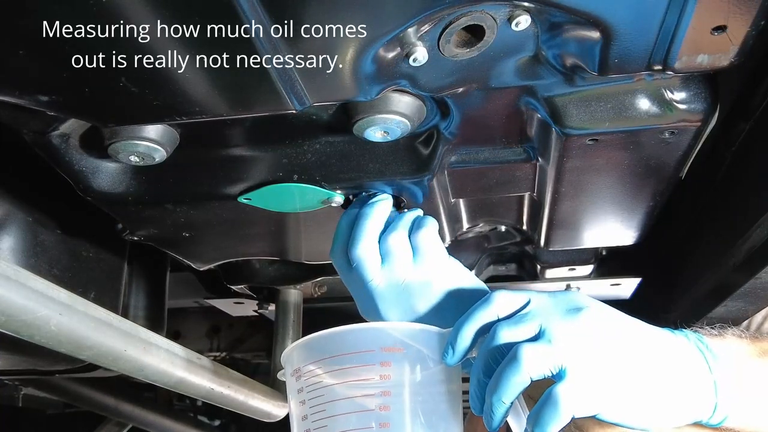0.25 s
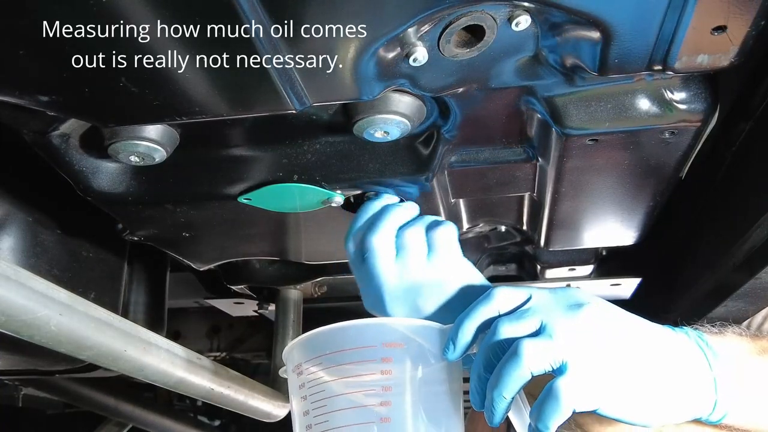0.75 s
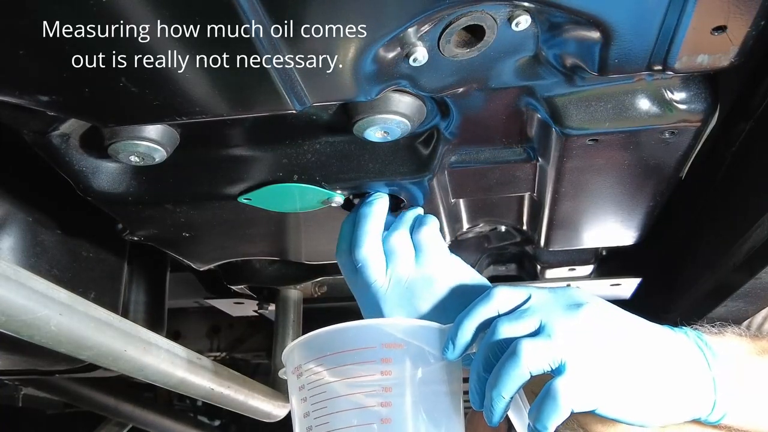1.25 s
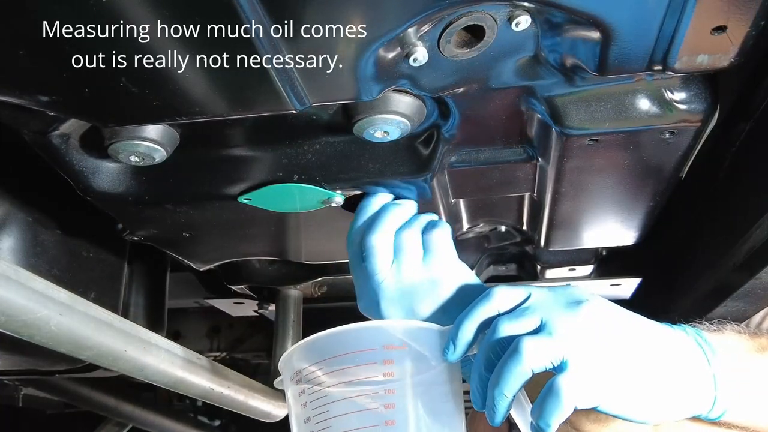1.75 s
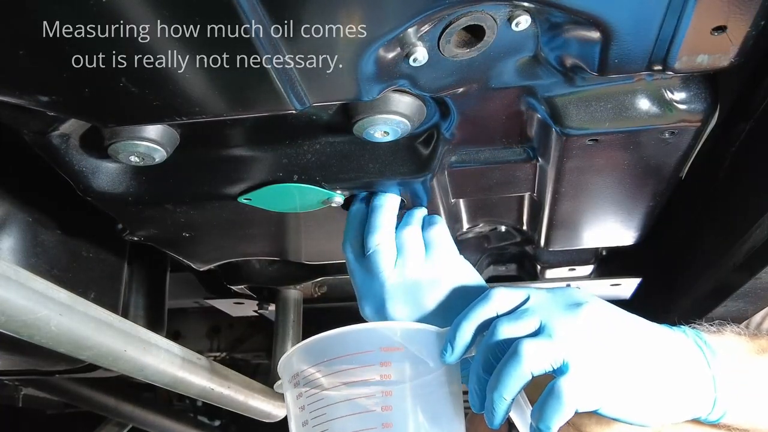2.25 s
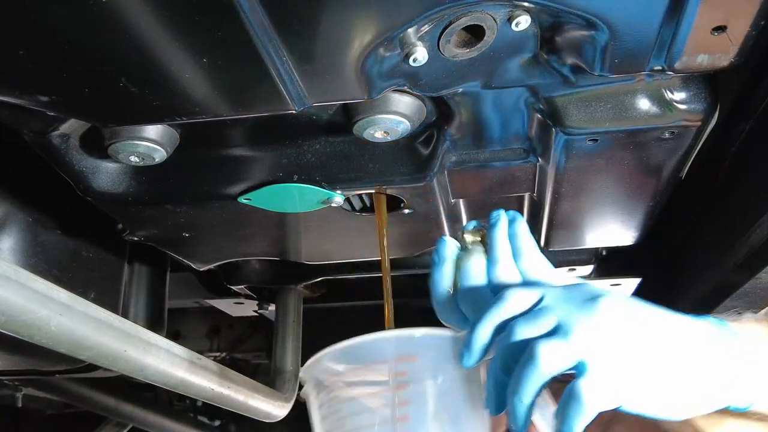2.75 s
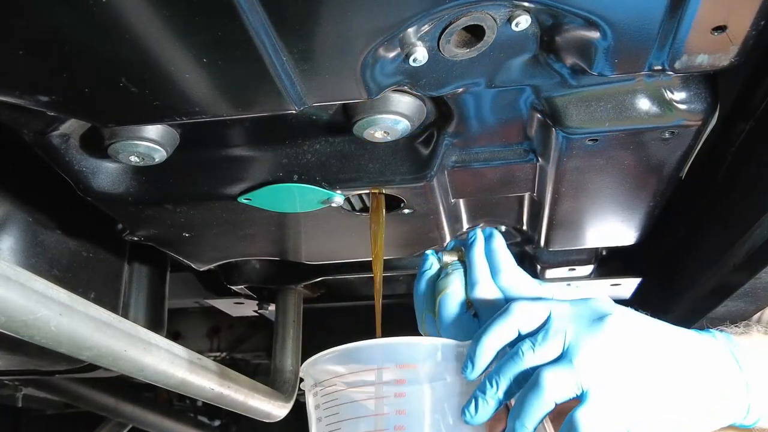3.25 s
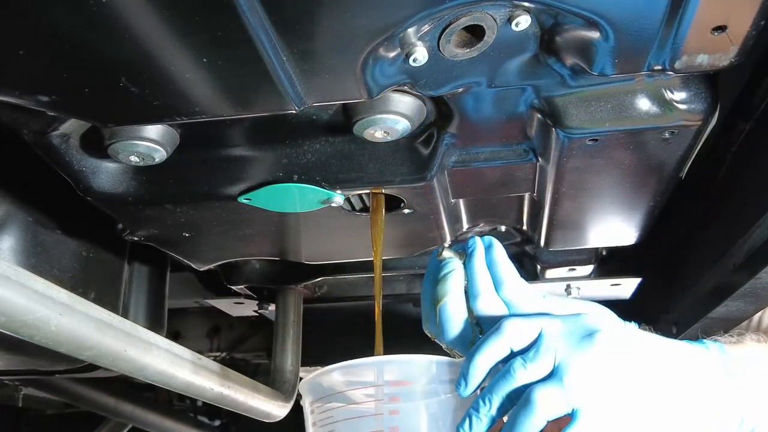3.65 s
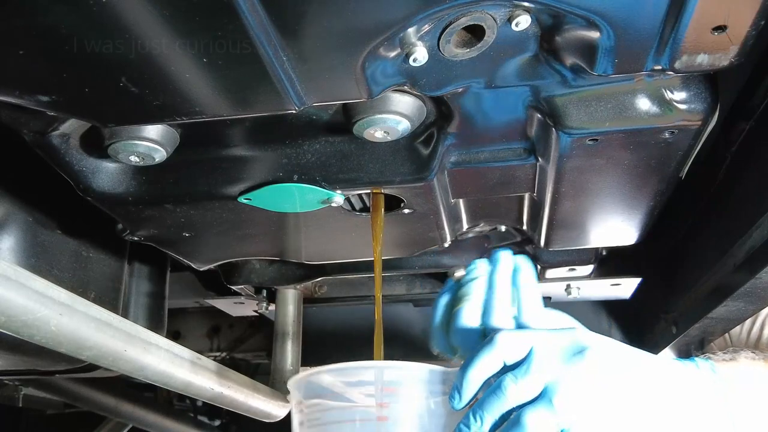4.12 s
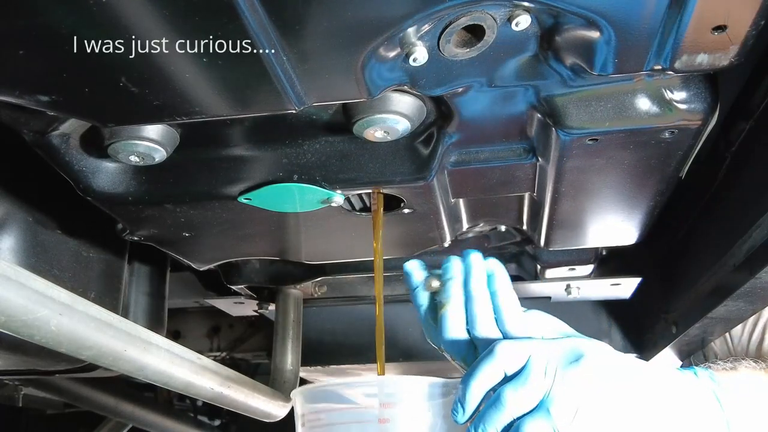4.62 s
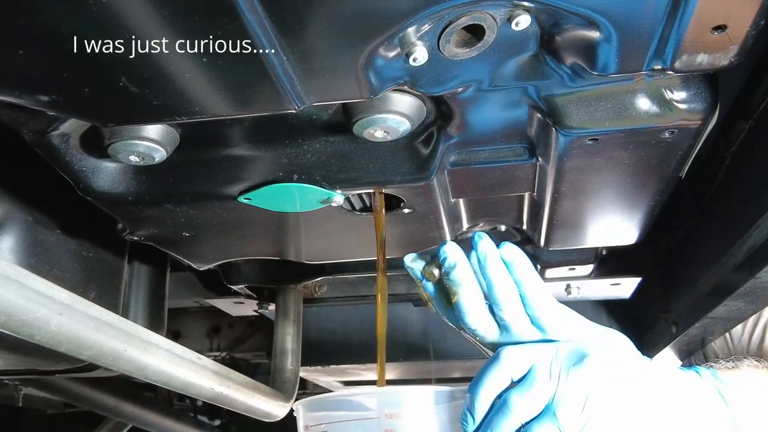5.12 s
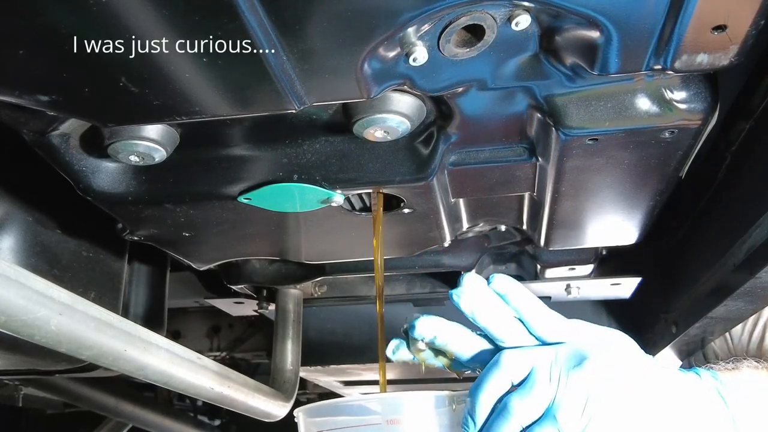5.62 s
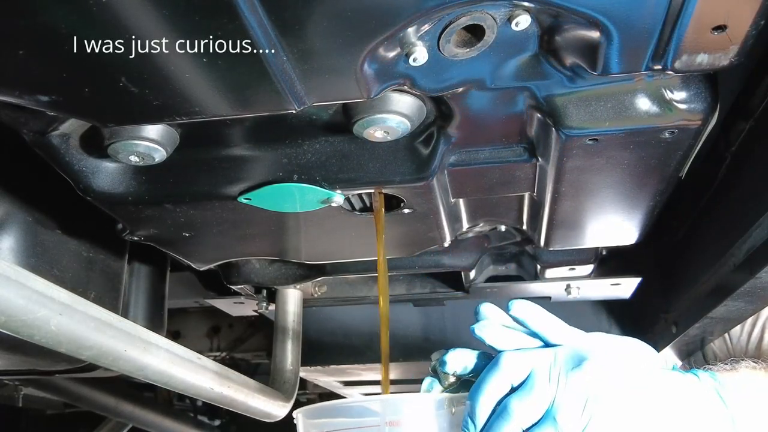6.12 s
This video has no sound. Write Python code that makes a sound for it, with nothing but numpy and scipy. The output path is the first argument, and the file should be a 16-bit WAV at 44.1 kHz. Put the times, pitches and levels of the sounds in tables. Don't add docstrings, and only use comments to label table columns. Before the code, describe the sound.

A close microphone under a car picks up a low, uneven outdoor rumble, soft air and faint hiss, with a short garage echo. From 0 to 2.4 seconds a rubber glove rubs a metal plug in quiet, irregular strokes, with small dry ticks and dull hand bumps. Around 2.5 to 2.9 handling gets busier: ticks cluster, moving air pushes the microphone, and at 2.9 a short, falling wet knock marks oil hitting the plastic cup. At 3.33 something hard lands with a loud, bright clack over a hollow body, then rattles through quick, weaker bounces until about 3.43. Oil then runs smoothly, almost silent, with slight cup resonance and bubbles. From about 4.8, hollow plastic drips ring near 4.78, 5.13, 5.45, 5.78 and 6.1, among glove snaps and a cluster of crackles around 5.1, ending quietly near 6.3.

```python
import sys
import numpy as np
from scipy import signal
from scipy.fft import rfft, irfft, next_fast_len
from scipy.io import wavfile
from scipy.ndimage import uniform_filter1d

SR = 44100
rng = np.random.default_rng(int(sys.argv[2]) if len(sys.argv) > 2 else 0)


def master(y):
    cut = np.clip(np.atleast_2d(y).T, -1, 1)
    pcm = np.round(cut * 32767)
    wavfile.write(sys.argv[1], SR, pcm.astype(np.int16))


def linear_from_db(decibels):
    return 10 ** (np.asarray(decibels, float) / 20)


N = 281121
PUFF_LEN = SR // 4

# (frequency [Hz], level [dB per Hz])
RUMBLE_SPECTRUM = [(15, 1), (25, 3.5), (40, -0.5), (55, -4.5), (100, -10), (140, -11.5), (200, -29.5),
                   (300, -31)]
# (frequency [Hz], level [dB per Hz])
AIR_SPECTRUM = [(110, -7), (160, -1.5), (300, -3), (500, -8.5), (800, -4.5), (1250, -10.5), (1700, -24)]
# (frequency [Hz], level [dB per Hz])
HISS_SPECTRUM = [(1000, -11), (1600, -6.5), (2500, -0.5), (3200, -9), (5000, -8), (8000, -12), (10000, -17),
                 (16000, -16.5)]
# (time [s], height [full scale], width [s])
AIR_PUSHES = [(2.54, -0.0024, 0.011), (2.56, 0.00029, .008), (2.672, -0.0077, 0.013), (2.744, 0.011, 0.009),
              (2.807, -0.0098, 0.011), (2.875, 0.005, 0.03), (2.935, -0.0044, 0.007)]
# (frequency [Hz], width [Hz], level [dB])
RUBBED_PARTS = [(1250, 11, -5), (1600, 1000, 0), (1960, 300, 5.5), (2600, 490, 5), (3400, 140, -13),
                (4525, 240, -7)]
# (time [s], length [s], body level [dB], bright level [dB])
GLOVE_STROKES = [(0.01, 0.54, -63.5, -77), (0.677, 0.14, -67, -72), (1.003, 0.12, -64, -71.5),
                 (1.322, .04, -69, -63.5), (1.546, 0.038, -62, -66), (1.647, 0.15, -65, -65),
                 (1.847, 0.035, -58, -67), (0.984, 0.056, -60.5, -76.5), (2.208, 0.032, -56, -83),
                 (2.366, 0.092, -65, -69), (2.541, 0.025, -54, -58), (2.614, 0.027, -44.5, -84),
                 (2.68, 0.038, -51, -55), (2.773, 0.029, -38, -64), (2.9, 0.041, -49.5, -62),
                 (3.33, 0.11, -57.5, -84.5), (3.59, 0.18, -60.5, -90), (4.056, 0.15, -67, -92),
                 (4.387, 0.73, -65.5, -71.5), (4.707, 0.078, -61.5, -80.5), (5.03, 0.137, -59, -87),
                 (5.138, 0.03, -46, -78.5), (5.25, 0.066, -82, -66), (5.356, 0.13, -61.5, -86),
                 (5.462, 0.011, -74.5, -54), (5.786, 0.055, -65.5, -76.5), (5.91, 0.044, -55, -91),
                 (6.125, .03, -61, -86), (6.282, 0.35, -71.5, -71)]
# (time [s], peak [dB], ring [Hz], bright edge [dB])
PLUG_RINGS = [(0.031, -58, 1940, -40), (0.2262, -57.5, 2750, -8), (1.1428, -60.5, 2900, -11),
              (1.3399, -58.5, 3170, -8), (1.6382, -58.5, 1930, -40), (1.641, -59.5, 4600, -40),
              (2.4903, -53.5, 2900, -10), (2.6003, -50, 2470, -38), (2.6691, -52.5, 2600, 0.5),
              (2.7564, -47, 2510, -25), (2.876, -50.5, 6380, 0), (4.9841, -56, 2500, -6)]
# (time [s], peak [dB], ring [Hz], bright edge [dB])
FINGER_TAPS = [(0.629, -64, 2270, -13), (1.8622, -53.5, 2250, -22), (2.0293, -62.5, 1690, -1),
               (2.1923, -55.5, 2600, 4.5), (2.351, -62, 1990, 3), (2.7739, -46, 1980, -7),
               (2.8495, -50.5, 2410, -15), (2.8954, -44, 1604, -3), (2.9362, -57.5, 2470, -17),
               (3.116, -65, 2380, -0.5), (4.3716, -60, 2100, -3), (4.428, -64, 2900, 1),
               (4.497, -69, 2450, -32.5), (4.6196, -62, 1088, -2), (5.0026, -56, 2470, -20),
               (5.1304, -47, 1990, -52), (5.165, -54, 1960, -0.5), (5.6513, -52, 2280, -34.5),
               (5.751, -51.5, 2533, -30), (5.89, -54, 2180, -15.5), (6.002, -69, 2250, -31)]
# (time [s], peak [dB], ring [Hz], bright edge [dB])
GLOVE_SNAPS = [(0.0727, -63, 3160, -31), (0.154, -62.5, 2240, -19), (0.888, -61.5, 2340, -3),
               (2.559, -55.5, 3360, -29), (2.564, -56.5, 2370, -30), (4.052, -60, 2105, -22),
               (4.147, -62.5, 2200, -18), (4.232, -61, 2520, -22), (4.635, -62, 2470, -11),
               (4.927, -62.5, 2100, -22), (5.114, -41, 1960, -31), (5.131, -42, 4600, -29),
               (5.608, -67, 1110, -23), (6.301, -58.5, 1200, -15), (4.836, -66, 7740, -6),
               (5.181, -63, 9950, -10), (1.728, -65.5, 3200, -16.5), (3.888, -48, 5430, -46),
               (3.886, -62, 4150, -30), (4.038, -57.5, 2154, -13.5), (4.127, -60, 1727, -23),
               (4.8707, -59.5, 2140, -19.5), (5.032, -56.5, 8350, -17), (5.053, -48, 1600, -18),
               (5.0817, -55, 1990, -5), (5.1093, -41.5, 2540, -11.5), (5.208, -51.5, 2770, -10),
               (5.146, -52, 7730, -14), (5.234, -55, 7000, -18), (5.252, -57.5, 7100, -1),
               (5.369, -63, 4970, -16), (5.3416, -51, 2020, -17.5), (5.939, -55, 2700, -29.5)]
# (time [s], peak [dB], ring [Hz], bright edge [dB])
OIL_SPECKS = [(1.139, -61, 4270, -30), (1.341, -61, 4760, -30), (1.356, -61, 4500, -30),
              (1.861, -51, 2400, -28), (2.029, -69, 5170, -12), (2.556, -63, 4400, -20),
              (2.598, -61, 3640, -13), (2.609, -57, 5000, -18), (2.766, -62, 3140, -14),
              (2.783, -46, 1430, -14), (4.987, -60, 5170, -12), (5.034, -63, 11500, -20),
              (5.064, -67, 5500, -18), (5.089, -64, 9500, -2), (5.098, -62, 8200, -6),
              (5.166, -63, 10300, -8), (5.253, -60, 10300, -12), (5.255, -64, 4300, -14),
              (4.34, -63.5, 2800, -20), (4.468, -61.5, 2500, -25), (4.74, -70, 3010, -20),
              (5.70, -67, 2900, -20), (5.749, -57, 1390, -25), (5.84, -68, 2600, -20),
              (2.626, -57, 2000, -20), (2.645, -60, 1300, -20)]
# (time to fall 60 dB [s], dull push [dB], top of the body [Hz])
TICK_SHAPES = [
    (0.091, 0, 7000),
    (.042, 4.5, 2400),
    (0.028, -24.5, 3580),
    (.022, -23, 3900),
]
# (time [s], peak [dB], pitch [Hz])
HAND_BUMPS = [(1.342, -58, 126), (2.183, -53, 191), (2.356, -52.5, 149), (2.528, -62, 49.3),
              (2.665, -50, 85), (2.731, -54, 50), (2.764, -52, 323), (2.797, -65, 44)]
# (time [s], peak [dB], pitch [Hz])
OIL_BUBBLES = [(2.028, -52.5, 750), (2.485, -57, 770), (2.876, -43, 560), (3.112, -51, 410),
               (3.498, -56, 610), (4.467, -49, 590), (4.474, -49, 610), (4.62, -57, 1000), (5.05, -50, 662),
               (5.11, -48.5, 745), (3.115, -53.5, 670), (5.89, -59, 704), (5.209, -49, 2690)]
# (time [s], peak [dB], pitch [Hz])
CUP_NOTES = [(1.637, -60, 1890), (1.638, -69, 1900), (1.637, -59, 1217), (2.602, -54, 2680),
             (2.604, -55, 1600), (2.892, -56, 1744), (3.21, -72.5, 1770), (4.101, -68, 1900),
             (2.761, -61, 1530), (2.604, -53, 1250), (2.756, -51.5, 1960), (4.49, -50, 665)]
# (time [s], peak [dB], pitch [Hz], extra glide [octaves per s])
GLIDING_KNOCKS = [
    (2.8912, -26.5, 676, -17),
    (2.917, -41, 603, -18),
    (5.129, -64, 4700, -3),
    (5.188, -60.5, 1110, 61),
]
# (swell [s], time to fall 60 dB [s], glide [octaves per s])
KNOCK_SHAPES = [
    (0.012, 0.074, 7.5),
    (0.0046, 0.017, 6.5),
    (0.0035, 0.15, 1.5),
    (0.0095, 0.028, -7.5),
]
# (time [s], cup air note [dB], splash on the wall [dB])
OIL_STREAM = [(3.7, -99, -85), (4.0, -74.5, -89), (4.22, -67, -79.5), (4.4, -73.5, -76), (4.9, -69, -87.5),
              (5.25, -81, -81.5), (5.72, -74, -84.5), (6.1, -83, -94), (6.26, -68, -73.5),
              (6.37, -68, -83.5)]
# (frequency [Hz], width [Hz], level [dB])
WALL_SIZZLE = [(1810, 410, 2), (1970, 92, -3), (2900, 820, -1), (4338, 230, 3), (5800, 250, -3),
               (7600, 1900, -11.5)]
# (time [s], peak [dB], pitch factor, upper modes [dB])
TRAY_DRIPS = [(4.487, -48.5, 1.056, -4), (5.003, -53.5, 1.03, -8), (5.1338, -37.5, 1.003, -5),
              (5.4535, -38, 1.0, -1), (5.7758, -37.5, 0.999, 1), (6.100, -37, 1, -0.5)]
# (frequency [Hz], negative if first swinging inward, level [dB], time to fall 60 dB [s])
TRAY_LOW = [(108, -13.5, 0.093), (249.5, -18.5, 0.49), (381, -12.5, 0.2), (481, 1.5, 0.027),
            (-547, -22, 0.097), (616, 7, 0.05), (-682, -8.5, 0.076), (-641, -4.5, 0.22), (1022, -2, 0.032),
            (777, -15.5, 0.048), (309.5, -15, 0.12), (176, -18, .12)]
# (frequency [Hz], negative as above, level [dB], time to fall 60 dB [s])
TRAY_HIGH = [(1251.5, -1, 0.1), (1295.5, -12.5, 0.17), (-1210, -13.5, 0.19), (1362, -12.5, 0.057),
             (1600, -20, 0.022), (1811, -22, 0.054), (2360, -24, 0.11), (2461, -13, 0.041),
             (2620, -22, 0.057), (2852, -17.5, 0.05), (4257, -18, 0.021), (4824, -17, 0.018)]
# (time [s], peak [dB], pitch factor, upper modes [dB])
RIM_DRIPS = [(4.7775, -38, 1.0, -10), (4.788, -54, 1.0, 9)]
# (frequency [Hz], negative as above, level [dB], time to fall 60 dB [s])
RIM_LOW = [(337.5, -16, 0.14), (379, -20, .1), (482, -7, 0.072), (-540, -0.5, 0.14), (-598, -5.5, 0.17),
           (-644, 0.5, 0.14), (658, 1, 0.2), (691.5, -11, 0.18), (759, -15, 0.12), (-832, -0.5, 0.055),
           (-640, 7, 0.016)]
# (frequency [Hz], level [dB], time to fall 60 dB [s])
RIM_HIGH = [(1312, -5, 0.1), (1470, 0, 0.075), (1400, -8, .04), (1040, -16, .03), (2680, -31, 0.152),
            (2870, -25.5, 0.054), (4300, -20, 0.023)]
# (time [s], peak [dB], low modes [dB], favoured pitch [Hz])
BOUNCES = [(3.332, -17, 1, 1920), (3.3331, -9, -20, 2480), (3.3369, -21.5, -17, 2380),
           (3.354, -32.5, -25, 1800), (3.3805, -21.5, -12.5, 2400), (3.386, -35, -20, 2100),
           (3.4097, -30.5, -14.5, 2100), (3.414, -34.5, -11.5, 1460), (3.433, -36, -16, 3300)]
# (frequency [Hz], level [dB], time to fall 60 dB [s])
HOLLOW_BODY = [(374, -10, 0.135), (419, -6, 0.075), (470, -13, 0.13), (524, -2.5, .12), (563, 1, 0.095),
               (606, -1, 0.068), (638, -24, .15), (722, -20, 0.12), (1000, -17, .045)]
# (frequency [Hz], level [dB], time to fall 60 dB [s])
HARD_SHELL = [(1290, -15, 0.016), (1510, -13, 0.024), (1725, -2.5, 0.035), (1861, -6.5, 0.026),
              (1950, -9, 0.043), (2100, -7.5, 0.018), (2348, -5, 0.022), (2476, -3.5, 0.025),
              (2700, 0, 0.02), (2900, -12, 0.017), (3170, -10.5, 0.039), (3640, -7, 0.019),
              (4540, -13, .02), (5940, -8.5, .018)]
# (frequency [Hz], time to fall 60 dB [s])
GARAGE_ECHO = [(300, 0.72), (1000, 0.36), (1800, .55), (3000, 0.55), (5000, 0.24), (8000, 0.28),
               (12000, 0.067)]
# (time [s], depth [dB], above [Hz])
TREBLE_GAPS = [(0.118, 17, 2500), (.93, 8, 2500), (1.02, 8, 3000), (1.595, 9, 2500), (2.683, 12, 1200),
               (4.049, 21, 3400), (4.176, 19, 3300), (4.305, 1, 2930), (4.57, 15, 1600), (4.817, 20, 1600),
               (5.33, 13, 3100), (5.435, 11, 3100), (5.54, 8.5, 3000), (5.585, 8.5, 2500), (5.94, 13, 1700),
               (6.157, 11, 3000), (6.29, 11, 3000)]

STIR_S, STIR_RISE_S, STIR_FALL_S, STIR_DB, STIR_IN_AIR = 2.73, 0.24, 0.064, 11.5, 0.73
STROKE_FADE_DB, REST_DB = 7.5, -94
FACE_DB_PER_OCTAVE = 7.5
HOLLOW_IN_STEP_S = 0.004
GAP_S = 0.022


def rms_one(x):
    return x / np.sqrt(np.mean(x ** 2) + 1e-20)


def in_time(rows):
    s, *columns = np.transpose(rows)
    return [np.interp(np.arange(N) / SR, s, column) for column in columns]


def at_hz(points, hz):
    curve_hz, value = np.array(points).T
    return np.interp(np.log(hz), np.log(curve_hz), value)


def band(x, low_hz, high_hz):
    sos = signal.butter(2, [low_hz, min(high_hz, 0.45 * SR)], "band", fs=SR, output="sos")
    return signal.sosfilt(sos, x)


def resonance(x, hz, width_hz):
    r = np.exp(-np.pi * width_hz / SR)
    gain = (1 - r * r) / 2
    return signal.lfilter([gain, 0, -gain], [1, -2 * r * np.cos(2 * np.pi * hz / SR), r * r], x)


def drift(rate):
    r = np.exp(-80 * np.pi * rate / SR)
    white = rng.standard_normal(N // 40 + 2002)
    slow = signal.lfilter([1], [1, -2 * r, r * r], white)[2000:]
    return np.interp(np.arange(N) / 40, np.arange(len(slow)), rms_one(slow))


def coloured(spectrum, low_hz, patchy_db, rate):
    out, white, together = 0, rng.standard_normal((2, N)), drift(rate / 4)
    for k in range(8):
        low = low_hz * 2 ** (k / 2)
        flicker_db = patchy_db * (0.3 * together + drift(rate))
        level_db = at_hz(spectrum, low * 2 ** 0.25) + flicker_db
        out = out + linear_from_db(level_db) * band(white[k % 2], low, low * np.sqrt(2))
    return rms_one(out)


def add(out, s, sound):
    i = round(s * SR)
    out[i:i + len(sound)] += sound[:N - i]


def burst(t60):
    return rng.standard_normal(PUFF_LEN) * linear_from_db(-60 * np.arange(PUFF_LEN) / SR / t60)


def struck(modes, contact_s, pitch=1, in_step_s=0):
    t = np.arange(PUFF_LEN) / SR
    rings = 0
    for hz, db, t60 in modes:
        rings = rings + linear_from_db(db - 60 * t / t60) * np.sin(2 * np.pi * hz * pitch * (t - in_step_s))
    return rings * (1 - np.exp(-t / contact_s))


def background():
    late = np.arange(N) / SR - STIR_S
    stir_db = STIR_DB * np.exp(-abs(late) / np.where(late < 0, STIR_RISE_S, STIR_FALL_S))
    rumble = linear_from_db(-62 + stir_db) * coloured(RUMBLE_SPECTRUM, low_hz=15, patchy_db=2.0, rate=4.2)
    air = linear_from_db(-69.5 + STIR_IN_AIR * stir_db) * coloured(AIR_SPECTRUM, low_hz=107.7, patchy_db=0.05, rate=2.7)
    hiss = linear_from_db(-80) * coloured(HISS_SPECTRUM, low_hz=1000, patchy_db=2.0, rate=5.7)
    return rumble + air + hiss


def pushes():
    t = np.arange(N) / SR
    return sum(height * np.exp(-((t - s) / width) ** 2) for s, height, width in AIR_PUSHES)


def pressure():
    t, levels = np.arange(0, N + 64, 64) / SR, REST_DB
    for s, length, mid_db, bright_db in GLOVE_STROKES:
        fade_db = STROKE_FADE_DB * abs(2 * (t - s) / length) ** 1.2
        levels = np.maximum(levels, np.array([[mid_db], [bright_db]]) - fade_db)
    return [np.interp(np.arange(N) / SR, t, level) for level in levels]


def rustle():
    mid_db, bright_db = pressure()
    born = rng.random(N) < 900 * linear_from_db(5.0 * drift(14.0)) / SR
    grain_size = linear_from_db(1.1 * rng.exponential(1, N).clip(0, 4))
    grains = rms_one(born * grain_size * rng.standard_normal(N))
    rub = (0.6 * rng.standard_normal(N) + 0.8 * grains) * linear_from_db(3 * drift(18.0))
    body = sum(linear_from_db(db) * resonance(rub, hz, width) for hz, width, db in RUBBED_PARTS)
    body = body + 0.18 * band(rub, 900, 4300)
    bright = resonance(rub, 8600, 1400) + 0.16 * band(rub, 3600, 21000)
    return linear_from_db(mid_db - 12.5) * rms_one(body) + linear_from_db(bright_db - 11.5) * rms_one(bright)


def ticks(tables, shapes):
    out = np.zeros(N)
    first_touch = 1 + 0.72 * np.exp(-np.arange(PUFF_LEN) / SR / 0.0008)
    for table, (t60, low_db, top_hz) in zip(tables, shapes):
        for s, db, hz, bright_db in table:
            puff = burst(t60) * first_touch
            ring = resonance(resonance(puff, hz, hz / 8), hz, hz / 8)
            body = 2.2 * ring + 0.4 * band(band(puff, 900, top_hz), 900, top_hz)
            edge = band(band(puff, 4800, 11000), 3600, 13000)
            push = band(puff, 520, 1200)
            for part, level_db in [(body, -1.0), (edge, bright_db + 0.5), (push, low_db)]:
                add(out, s, linear_from_db(db + level_db) * part / np.max(abs(part)))
    return out


def knocks():
    out, t = np.zeros(N), np.arange(PUFF_LEN) / SR
    tables = [HAND_BUMPS, OIL_BUBBLES, CUP_NOTES, GLIDING_KNOCKS]
    for table, (swell, t60, glide) in zip(tables, KNOCK_SHAPES):
        rise = np.sin(np.pi / 2 * t / swell) ** 2
        shape = np.where(t < swell, rise, linear_from_db(-60 * (t - swell) / t60))
        for s, db, hz, *own_glide in table:
            pitch = hz * 2 ** np.minimum((glide + sum(own_glide)) * t, 1)
            add(out, s, linear_from_db(db) * shape * np.sin(2 * np.pi * np.cumsum(pitch) / SR))
    return out


def stream():
    silence = [(0, -120, -120), (3.65, -120, -120)]
    note_db, sizzle_db = in_time(silence + list(OIL_STREAM))
    white = rng.standard_normal(N) * linear_from_db(1.6 * drift(21.0))
    note = resonance(resonance(white, 290, 60), 290, 60)
    sizzle = 0
    for hz, width, db in WALL_SIZZLE:
        sizzle = sizzle + linear_from_db(db) * resonance(resonance(white, hz, width), hz, width)
    hits = (rng.random(N) < 90 / SR) * linear_from_db(1.8 * rng.standard_normal(N))
    droplets = 0
    for hz in (1500, 2100, 2850):
        chosen = hits * (rng.random(N) < 0.4)
        droplets = droplets + resonance(chosen + 1e-18, hz, 247)
    droplets = band(band(droplets, 1000, 3300), 710, 3300)
    return linear_from_db(note_db + 31.0) * droplets + linear_from_db(note_db) * rms_one(note) + linear_from_db(sizzle_db) * rms_one(sizzle)


def drips(table, lower, upper):
    out = np.zeros(N)
    for s, db, pitch, upper_db in table:
        tap = struck(lower, 0.0018, pitch) + linear_from_db(upper_db) * struck(upper, 0.0018, pitch)
        wobble = rms_one(band(rng.standard_normal(len(tap)), 5, 90))
        tap = tap * (1 + 0.2 * wobble)
        puff = burst(0.115)
        splash = linear_from_db(upper_db - 22.0) * band(puff, 280, 2000)
        splash = splash + linear_from_db(upper_db - 24.5) * band(puff, 3500, 9700)
        add(out, s, -linear_from_db(db) * (tap + splash))
    return out


def drop():
    beamed, spread = np.zeros(N), np.zeros(N)
    for s, db, low_db, face_hz in BOUNCES:
        face_modes = []
        for hz, level_db, t60 in HARD_SHELL:
            face_modes.append((hz, level_db - FACE_DB_PER_OCTAVE * abs(np.log2(hz / face_hz)), t60))
        shell = band(band(struck(face_modes, 0.00074), 970, 17000), 900, 14000)
        hollow = struck(HOLLOW_BODY, 0.00086, in_step_s=HOLLOW_IN_STEP_S)
        boom = linear_from_db(low_db - 8) * band(band(burst(0.08), 450, 640), 450, 640)
        crack = linear_from_db(-7.0) * band(burst(0.08), 1300, 4000)
        sharp = band(band(burst(0.06), 3300, 9500), 2500, 9500)
        crack = crack + linear_from_db(-16.5 + 0.27 * (db + 14.0)) * sharp
        add(beamed, s, linear_from_db(db - 1.5) * shell)
        add(beamed, s, linear_from_db(db + low_db - 4.0) * hollow)
        add(spread, s, linear_from_db(db) * (boom + crack))
    no_bass = signal.butter(6, 310, "high", fs=SR, output="sos")
    return beamed, signal.sosfilt(no_bass, spread)


def garage(x):
    t, white = np.arange(SR // 2) / SR, rng.standard_normal(SR // 2)
    tail = 0
    for k in range(13):
        hz = 220 * 2 ** (k / 2)
        own = white[::-1] if k % 2 else white
        fade = linear_from_db(-60 * t / at_hz(GARAGE_ECHO, hz))
        tail = tail + band(own, hz / 2 ** 0.25, hz * 2 ** 0.25) * fade
    tail = tail * np.clip((t - 0.004) / 0.0034, 0, 1)
    return signal.fftconvolve(x, tail / np.sqrt(np.sum(tail ** 2)))[:N]


def scene():
    beamed, fall = drop()
    small = ticks([PLUG_RINGS, FINGER_TAPS, GLOVE_SNAPS], TICK_SHAPES)
    soft = knocks()
    taps = drips(TRAY_DRIPS, TRAY_LOW, TRAY_HIGH) + drips(RIM_DRIPS, RIM_LOW, RIM_HIGH)
    to_walls = linear_from_db(-20.0) * fall + linear_from_db(-22.5) * beamed + linear_from_db(-21.5) * taps
    to_walls = to_walls + linear_from_db(-19.0) * small + linear_from_db(-22.5) * soft
    near = beamed + fall + taps + small + soft
    mix = near + garage(to_walls) + rustle() + stream() + pushes() + background()
    specks = ticks([OIL_SPECKS], TICK_SHAPES[-1:])
    return (mix + specks)[None]


def patchy_top(x):
    size = next_fast_len(N)
    spectrum, lines, out = rfft(x, size), np.fft.rfftfreq(size, 1 / SR), x.copy()
    for k in range(5):
        low = 12750 + 680 * k
        strip = irfft(spectrum * ((lines >= low) & (lines < low + 680)), size)[:N]
        power = uniform_filter1d(strip ** 2, size=1024)
        loud_db = 10 * np.log10(power / np.median(power) + 1e-9)
        shut = 0.6 * loud_db + 3 * drift(20) < 2.5
        out -= uniform_filter1d(shut * 0.85, size=600) * strip
    return out


def treble_gaps(x):
    out, t = x.copy(), np.arange(N) / SR
    for s, depth_db, hz in TREBLE_GAPS:
        near = abs(t - s) < 0.07
        lines = np.fft.rfftfreq(near.sum(), 1 / SR)
        kept = rng.random(200) < 0.22
        lost = (lines > hz) & ~kept[(lines / 170).astype(int)]
        treble = irfft(rfft(out[:, near]) * lost, near.sum())
        dip_db = -depth_db * np.exp(-(2 * (t[near] - s) / GAP_S) ** 4)
        out[:, near] -= (1 - linear_from_db(dip_db)) * treble
    return out


def roll_off(x):
    return signal.sosfilt(signal.butter(12, 16060, fs=SR, output="sos"), x)


def record(dry):
    mix = treble_gaps(patchy_top(dry[0])[None])
    return roll_off(mix)


dry = scene()
out = record(dry)
master(out)
```